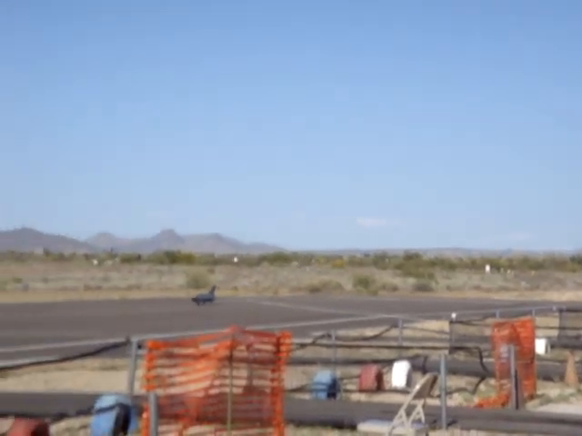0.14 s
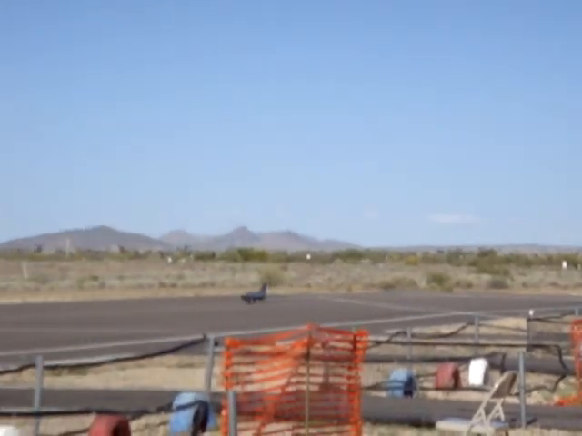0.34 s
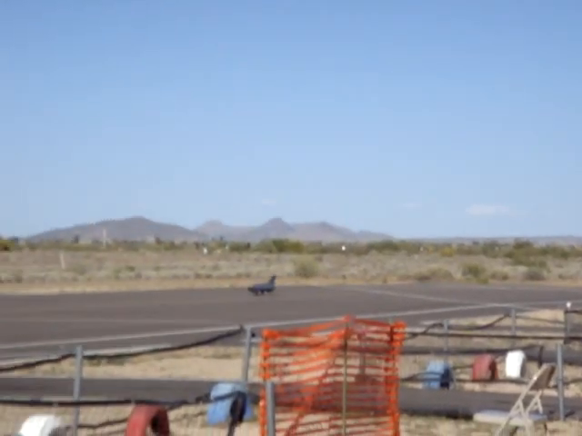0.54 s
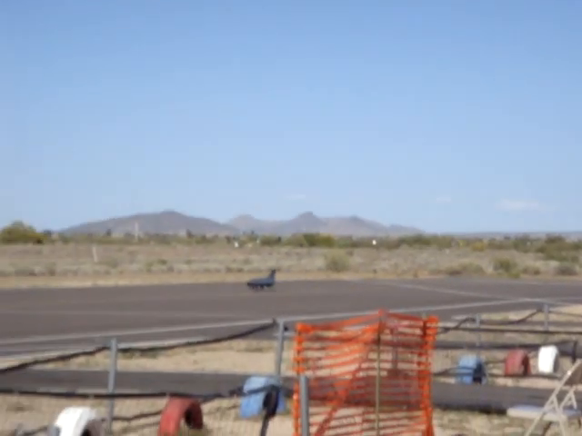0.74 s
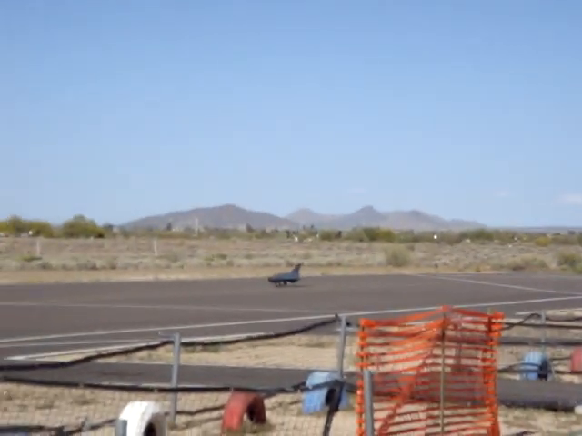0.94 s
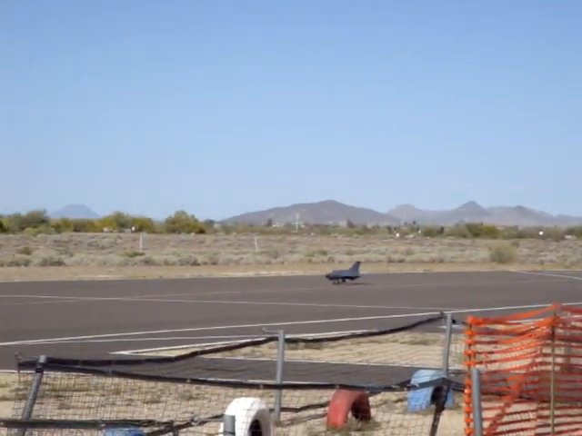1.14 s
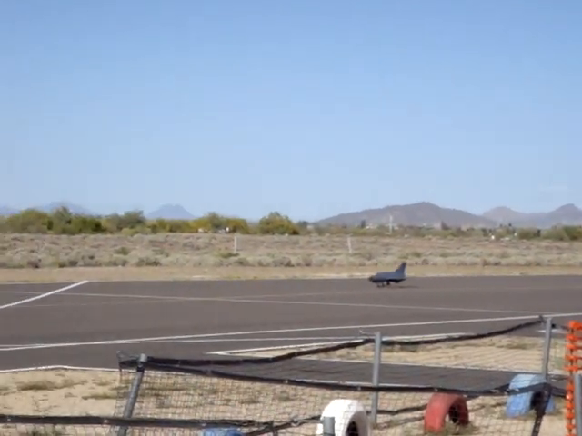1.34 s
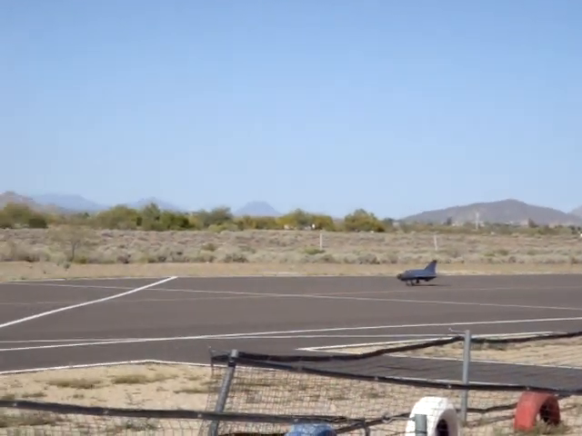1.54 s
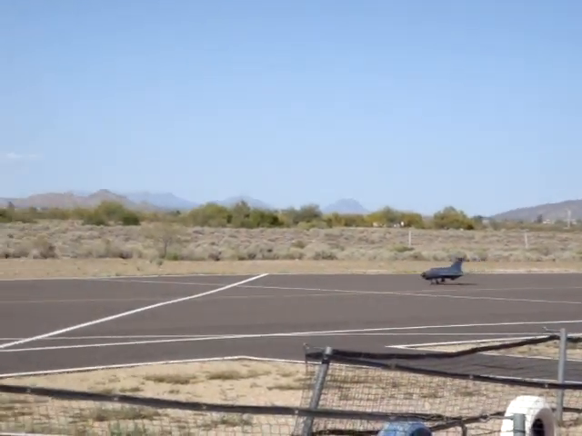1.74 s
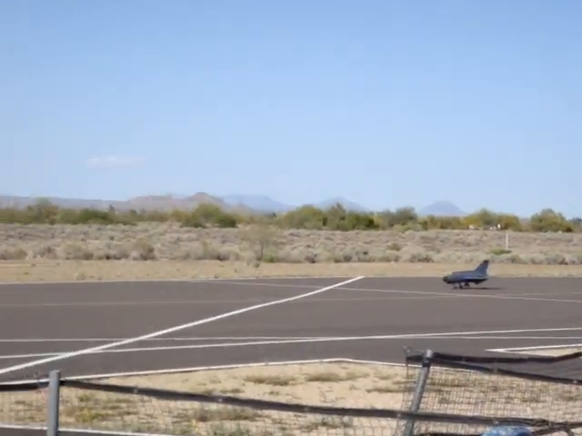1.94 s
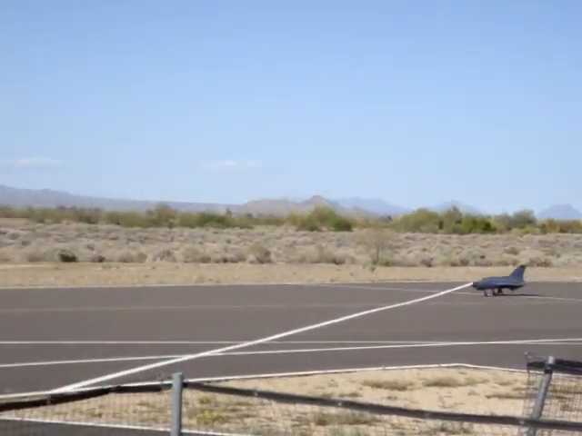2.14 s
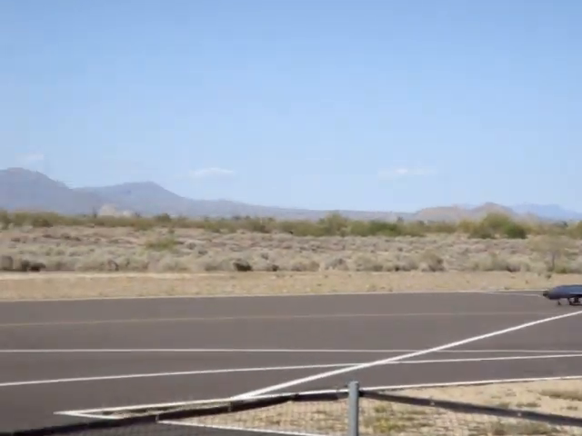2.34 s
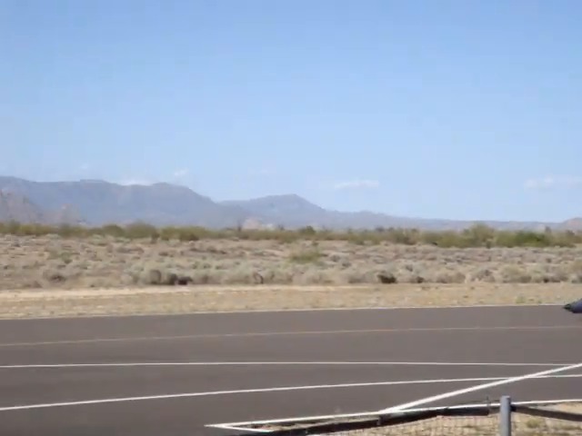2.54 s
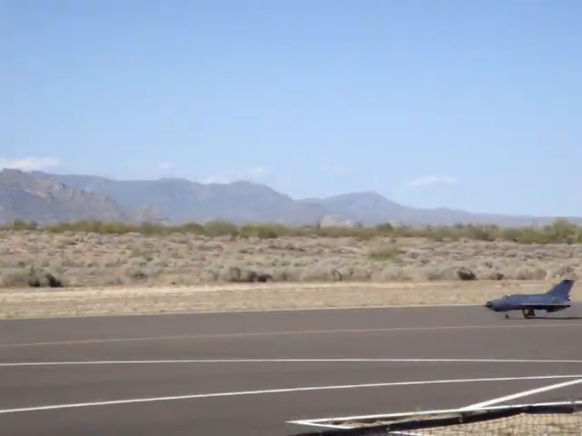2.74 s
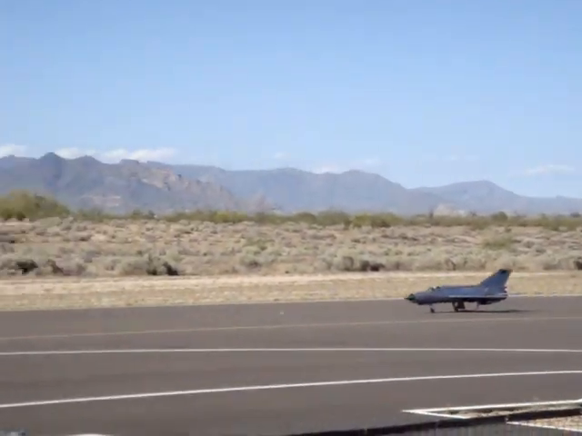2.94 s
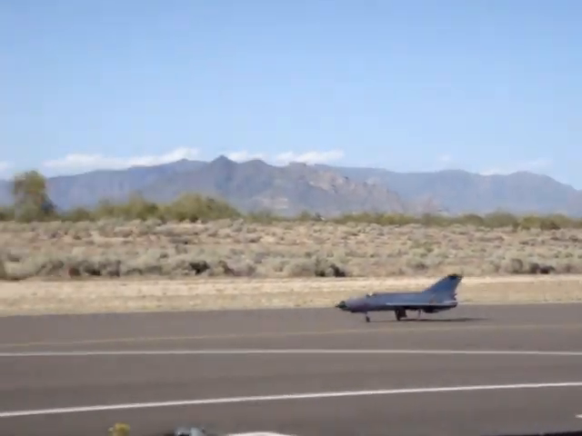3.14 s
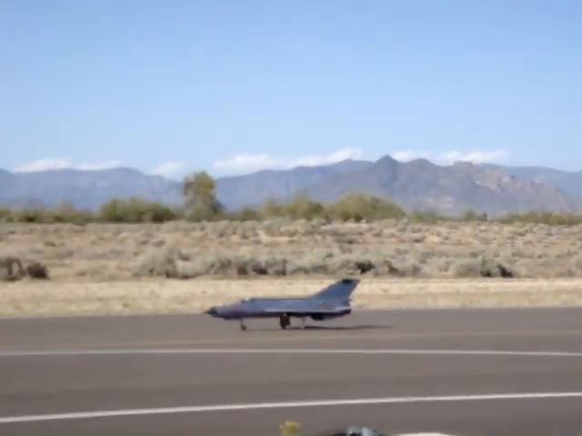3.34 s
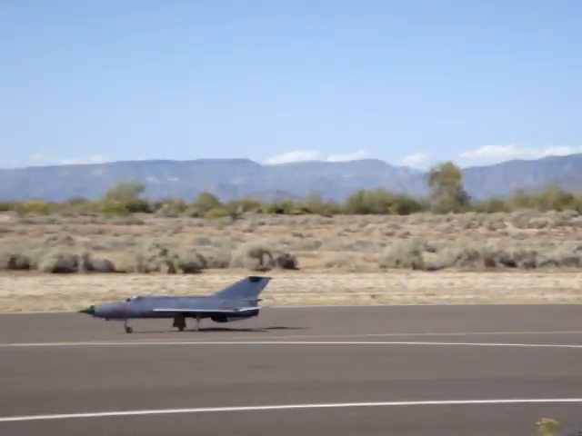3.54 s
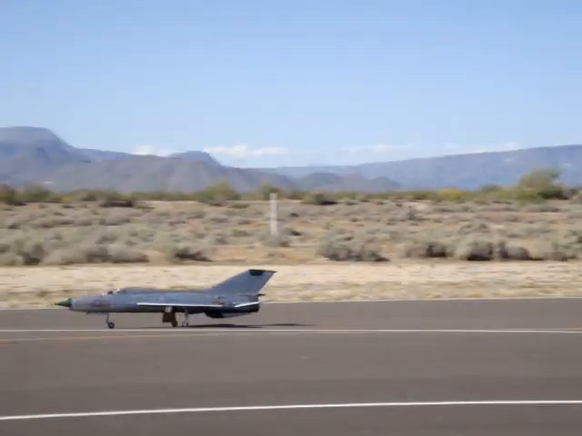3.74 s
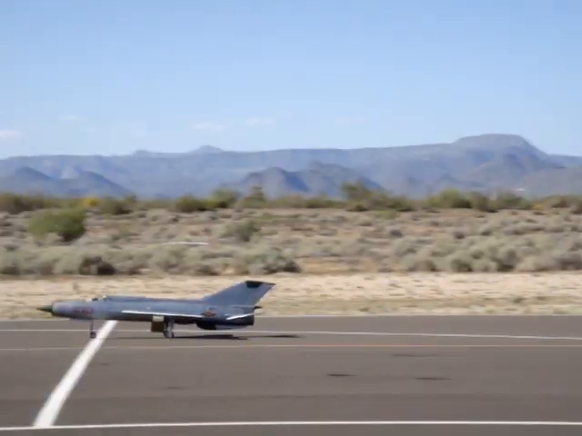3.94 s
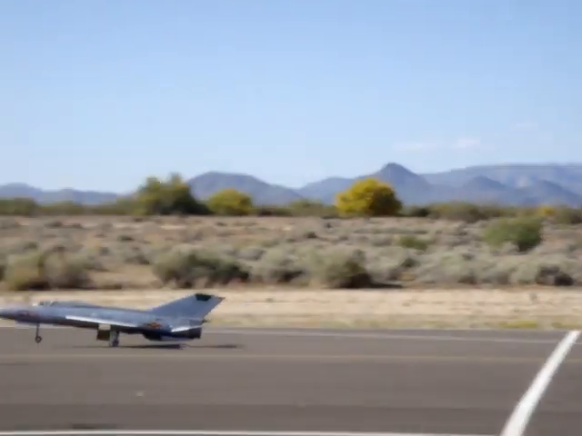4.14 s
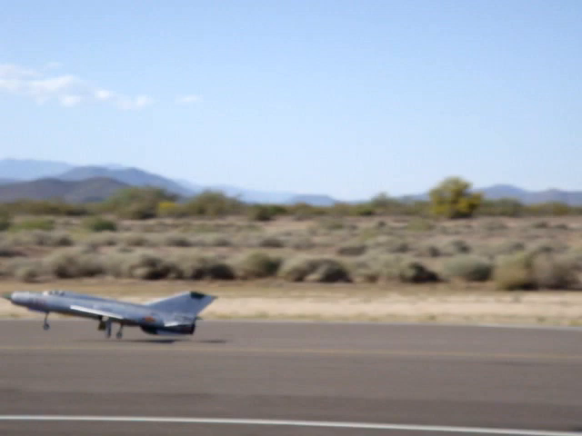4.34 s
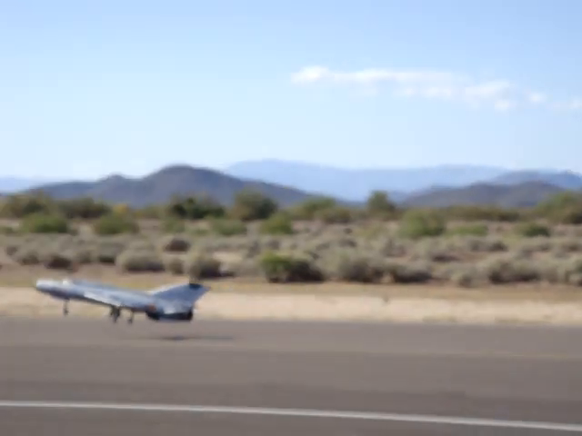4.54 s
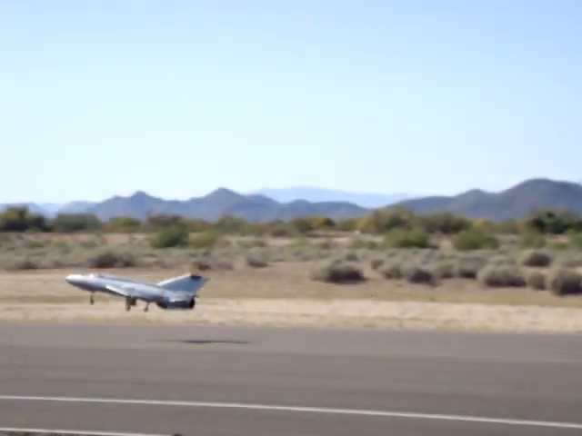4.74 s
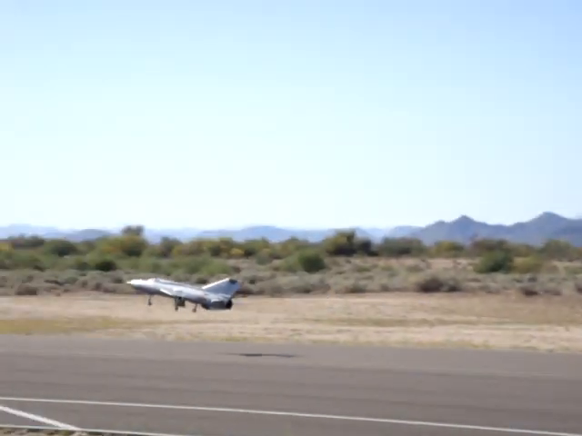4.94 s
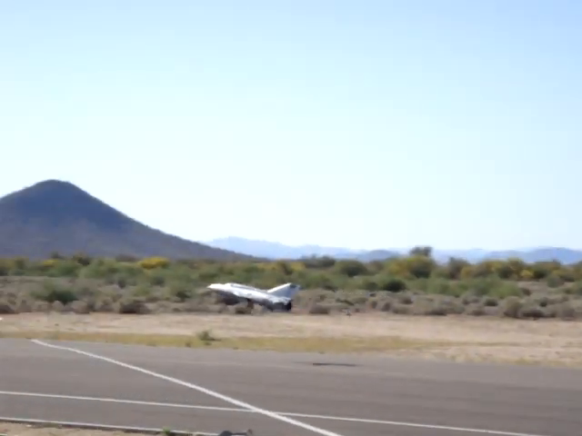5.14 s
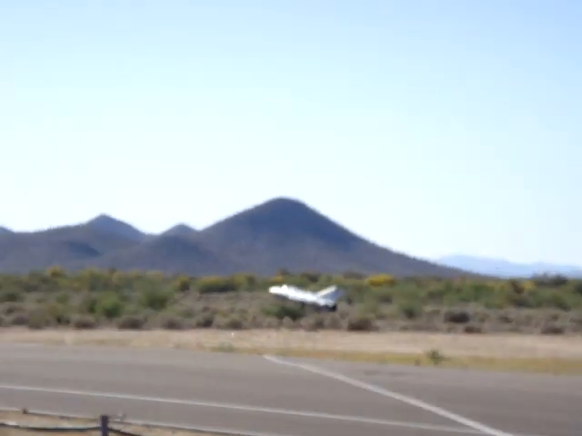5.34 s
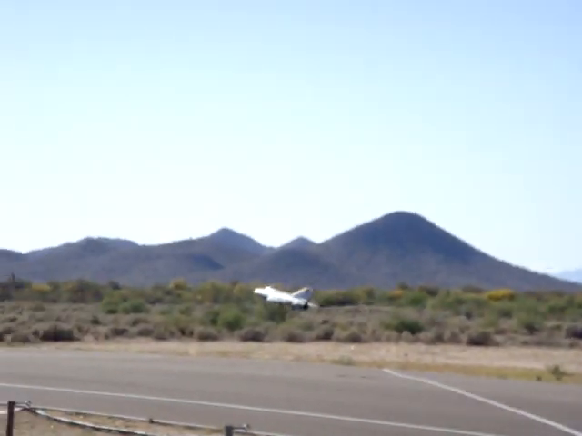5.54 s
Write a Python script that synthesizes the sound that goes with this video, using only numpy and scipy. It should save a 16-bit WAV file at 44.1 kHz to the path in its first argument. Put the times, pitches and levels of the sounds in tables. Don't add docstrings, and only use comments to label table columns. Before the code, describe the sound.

A small turbine model jet takes off from an open, dry airfield. From 0 s its hollow, noisy drone is already present, nasal and midrange with little deep bass, coloured by a shifting runway echo, with faint high rotor whine. Small dry camera ticks come near 0.6 s and once at 1.2 s. Wind bumps the microphone irregularly, hardest around 2.0 s and again near 2.4 s. The drone swells to its loudest at about 2.8-3.1 s, with a brief clear whistle near 3.1 s. The whine then drops away by about 4 s as the pitch slides slightly down and a bright, crackling exhaust hiss opens up. At about 4.6 s the jet lifts off: the lower body suddenly thins while hiss stays strong. The drone dips near 5.1 s, then swells again until the abrupt end at 5.7 s. Turbulent air makes everything waver; faint electronic hiss and grainy treble dropouts remain.

```python
import sys
import numpy as np
from scipy import signal
from scipy.io import wavfile
from scipy.ndimage import uniform_filter1d

SR = 44100
rng = np.random.default_rng(int(sys.argv[2]) if len(sys.argv) > 2 else 0)


def unload_audio(sound):
    columns = np.transpose(np.atleast_2d(sound))
    steps = np.round(np.clip(columns, -1, 1) * 32767)
    wavfile.write(sys.argv[1], SR, steps.astype(np.int16))


def boost(x):
    u = np.asarray(x, float) / 20
    return 10 ** u


N = 250929
HOP, SIZE = 256, 1024
FRAMES = N // HOP + 4

# [t/s,
# tailpipe drone level/dB, exhaust jet level/dB]
TAKEOFF_RUN = [(0, -31.5, -56.5), (.6, -25, -53), (1.3, -26.5, -52), (1.7, -24.5, -48), (2.15, -21.5, -45),
               (2.45, -19.5, -45), (2.62, -17.5, -43.5), (2.76, -14.5, -32.5), (3.02, -14.5, -36.5),
               (3.15, -16, -35), (3.5, -18, -29), (4.0, -23.5, -30), (4.06, -18.5, -28), (4.55, -20, -27),
               (4.75, -20, -25), (5.1, -26.5, -24), (5.3, -22.5, -25), (5.69, -17.5, -24)]


def evened(x):
    return x / np.sqrt(np.mean(x ** 2) + 1e-20)


def columns(rows, t):
    s, *values = np.transpose(rows)
    return [np.interp(t, s, v) for v in values]


def follow(law, t):
    drone_db, jet_db = columns(TAKEOFF_RUN, t)
    return law[0] * drone_db + law[1] * jet_db + law[2]


def resonances(modes, hz, shift, steep):
    return sum(boost(db) ** 2 / (1 + (2 * (hz - f * shift) / width) ** 2) ** steep for f, width, db in modes)


def at_level(power, db, hz, lo_hz, hi_hz):
    inside = (hz >= lo_hz) & (hz < hi_hz)
    return power / (power * inside).sum(1, keepdims=True) * boost(db)[:, None] ** 2


def drift(frames, bins):
    z = rng.standard_normal((FRAMES, SIZE // 2 + 1))
    for _ in range(2):
        z = uniform_filter1d(z, frames, axis=0)
        z = uniform_filter1d(z, bins, axis=1)
    return evened(z)


def noise(power):
    a, b = rng.standard_normal((FRAMES, SIZE // 2 + 1, 2)).transpose(2, 0, 1)
    z = np.sqrt(power * 8 / 3) * (a + 1j * b) / 2
    return signal.istft(z.T, nperseg=SIZE, noverlap=SIZE - HOP)[1][:N]


def air_gain_db(t, hz):
    # [t/s, half length/s, f/Hz, gain/dB]
    air_pockets = [(2.12, 0.15, 1250, 10), (1.7, 0.21, 2460, 3.5), (3.392, 0.02, 5000, -8),
                   (3.47, 0.029, 5300, 3.5), (3.664, 0.035, 6000, -9), (3.97, 0.0077, 8000, 12.5),
                   (4.325, 0.017, 5000, -10), (4.15, .15, 1170, 1.5), (.1, 0.13, 1150, 5.5),
                   (0.27, 0.062, 2000, 4.5), (0.73, 0.092, 900, 0), (4.735, 0.23, 7800, 6.5),
                   (5.4, 0.072, 2000, 4), (3.1, 0.026, 2600, 4), (3.07, .04, 7600, 6.5),
                   (4.7, 0.017, 6500, -2.5), (.7, 0.11, 2200, -4), (2.21, 0.075, 5700, 5),
                   (4.29, 0.18, 366, -4), (4.1, 0.07, 8200, 4), (4.04, .02, 5800, -9), (2.9, 0.13, 550, 2),
                   (2.4, 0.11, 2300, -3.5), (3.74, .06, 210, 5), (1.79, 0.044, 9000, 5.5),
                   (3.15, 0.044, 3700, 4), (2.89, 0.04, 1700, 4), (3.92, 0.085, 1300, 3.5),
                   (4.8, 0.13, 2200, -2.5), (5.62, 0.11, 180, 4)]
    # [t/s, gain/dB]
    eddy_fades = [(1.33, -3), (2.46, -0.5), (2.66, -5.5), (2.79, -3.5), (2.99, -2.5), (3.2, -1.5),
                  (3.39, -4), (3.555, -2.5), (3.74, -4.5), (3.84, -1), (3.97, -3.5), (4.03, -3.5),
                  (4.26, -2.5), (4.31, -1), (4.701, -0.5), (4.87, -2), (5.04, -0.5), (5.29, -3.5),
                  (5.5, -1.5)]
    bumps = [(*row, 0.48) for row in air_pockets]
    bumps += [(s, 0.016, 2200, db, 0.7) for s, db in eddy_fades]
    total_db = 0
    for s, half, f, db, octaves in bumps:
        in_time = np.exp(-.5 * ((t - s) / half) ** 2)
        in_pitch = np.exp(-.5 * (np.log2((hz + 1) / f) / octaves) ** 2)
        total_db = total_db + db * in_time * in_pitch
    return total_db


def doppler_factor(t):
    approach, recede, abeam_s, turn_s = 1.033, 0.99, 4.15, .15
    return (recede + (approach - recede) / (1 + np.exp((t - abeam_s) / turn_s)))[:, None]


def pair_balance(t):
    # [t/s, half length/s, change of share, pair level/dB]
    yaws = [(.05, 0.13, .5, 1), (1.02, 0.065, 0.69, -3), (1.35, .15, -0.13, 2.5), (2.85, .08, -.15, 0),
            (3.38, 0.15, 0.41, 1.5), (3.64, .06, -.4, 1.5), (3.9, 0.053, 0.24, 2), (4.128, 0.067, 0.28, 3),
            (4.453, 0.13, .15, 2), (5.3, 0.12, 0.053, -1)]
    share = np.clip(follow((-0.02, 0.021, 0.72), t), .1, .7)
    pair_db = follow((0.62, .42, 3.62), t)
    for s, half, swing, swell_db in yaws:
        bump = np.exp(-.5 * ((t - s) / half) ** 2)
        share = share + swing * bump
        pair_db = pair_db + swell_db * bump
    return np.clip(share, 0, 1)[:, None], pair_db


def tailpipe(t, hz, share, pair_db):
    # [f/Hz, width/Hz, level/dB]
    low_modes = [
        (517.3, 125, -5),
        (622.3, 128, -1.5),
    ]
    # [f/Hz, width/Hz]
    mode_pair = [
        (930, 95),
        (1125, 105),
    ]
    # [f/Hz, width/Hz, level/dB]
    third_mode = [
        (1515, 240, 2.5),
    ]
    # [f/Hz, width/Hz, level/dB]
    upper_modes = [
        (2122, 360, -1),
        (2530, 230, -6.5),
        (2710, 205, -4),
    ]
    doppler = doppler_factor(t)
    drone_db = columns(TAKEOFF_RUN, t)[0]
    low = resonances(low_modes, hz, np.ones((FRAMES, 1)), 3.06)
    low = at_level(low, drone_db, hz, 420, 780)

    (front_hz, front_width), (rear_hz, rear_width) = mode_pair
    front = resonances([(front_hz, front_width, 0)], hz, 1, 1.25)
    rear = resonances([(rear_hz, rear_width, 0)], hz, doppler, 1.25)
    second = at_level((1 - share) * front + share * rear, pair_db, hz, 910, 1300)

    top_db = np.minimum(follow((.1, 0.71, 16), t), -8)[:, None]
    upper = resonances(third_mode, hz, doppler, 1.26) + resonances(upper_modes, hz, 0.97, 0.92)
    upper = upper + resonances([(3340, 330, top_db)], hz, 0.93, 1.06)
    slant_db = follow((-0.19, 0.29, 6.6), t)[:, None]
    upper = upper * boost(slant_db * np.log2(np.clip(hz, 1300, 3500) / 2000)) ** 2
    upper = at_level(upper, follow((0.25, 0.69, 6.07), t) - .7, hz, 1540, 2660)
    return low + second + upper


def exhaust_jet(t, hz):
    jet_db = columns(TAKEOFF_RUN, t)[1]
    tilt_db = follow((-0.13, 0.1, -8), t)[:, None]
    hiss = boost(tilt_db * np.log2((hz + 1) / 5000)) ** 2 / (1 + (2500 / (hz + 1)) ** 2.95)
    port_low = 1.5 * resonances([(6280, 1700, 0.0063)], hz, 1, 1.1)
    port_high = 0.75 * resonances([(9560, 1800, 0.014)], hz, 0.95, 2.5)
    hiss = hiss * (1 + port_low + port_high)
    return at_level(hiss, jet_db - .8, hz, 3400, 10000)


def path_gain(t, hz, share):
    # [f/Hz, width/Hz, share removed level/dB]
    notches = [
        (867, 130, -3),
        (1235, 47, -5),
        (1770, 58, -8),
        (3070, 160, -3.5),
        (5090, 170, -13),
    ]
    # [t/s, first cancelled f/Hz, strength 0-1]
    runway_echo = [
        (0, 1950, 0.15),
        (.45, 1540, 0.4),
        (.8, 1260, 0.5),
        (1.1, 1020, 0.26),
        (1.3, 820, 0.07),
        (1.5, 630, 0.4),
        (1.7, 530, 0),
        (5.69, 480, 0),
    ]
    gain = np.clip(1 - (1 - .5 * share) * resonances(notches, hz, 1.0, 1.0), .05, 1)
    notch_hz, echo = (c[:, None] for c in columns(runway_echo, t))
    echo = np.clip(echo, 0, .9) * np.clip((hz - 750) / 250, 0, 1) / (1 + (hz / 3200) ** 4)
    gain = gain * (1 + 2 * echo / (1 + echo ** 2) * np.cos(np.pi * hz / notch_hz))
    gain = gain * boost(air_gain_db(t[:, None], hz)) ** 2
    lift_s, lift_db, lift_hz = 4.615, -6, 2410
    airborne = np.clip((t[:, None] - lift_s) / 0.011, 0, 1)
    gain = gain * boost(lift_db * airborne / (1 + (hz / lift_hz) ** 3)) ** 2
    return gain / (1 + (260 / (hz + 1)) ** 6)


def engine():
    t, hz = np.arange(FRAMES) * HOP / SR, np.fft.rfftfreq(SIZE, 1 / SR)[None]
    share, pair_db = pair_balance(t)
    gain = path_gain(t, hz, share)
    scatter_db = 1.3 * drift(frames=14, bins=5) + .9 * drift(frames=4, bins=30)
    scatter_db = np.clip(hz / 2000, .2, 1) * scatter_db
    body = noise(tailpipe(t, hz, share, pair_db) * gain * boost(scatter_db) ** 2)
    patches_db = 1.16 * drift(frames=8, bins=20) + 2.7 * drift(frames=2, bins=40)
    fizz = noise(exhaust_jet(t, hz) * gain * boost(patches_db) ** 2)
    flutter = evened(uniform_filter1d(rng.standard_normal(N), size=180))
    return body + fizz * boost(.6 * flutter)


def rotor_tone(hz, db, twinkle_db):
    waver = evened(uniform_filter1d(rng.standard_normal(N), size=900))
    twinkle = evened(uniform_filter1d(rng.standard_normal(N), size=1500))
    turns = np.cumsum(hz * (1 + .0022 * waver)) / SR
    return np.sqrt(2) * boost(db + twinkle_db * twinkle) * np.sin(2 * np.pi * turns)


def whine():
    # [t/s, f/Hz]
    shaft = [
        (0, 2056),
        (.9, 2098),
        (1.9, 2141),
        (2.65, 2156),
        (3.3, 2148),
        (3.65, 2100),
        (4.1, 2060),
    ]
    # [t/s, half length/s, f/Hz, level/dB]
    glints = [
        (1.1, .05, 4220, -63),
        (1.64, .09, 4233, -51),
        (2.2, .08, 4258, -56),
        (2.7, .05, 4298, -52),
        (3.13, .09, 4306, -37),
    ]
    t = np.arange(N) / SR
    hz, = columns(shaft, t)
    out = rotor_tone(3 * hz, follow((0, 0.87, -21.5), t) + 1.5, twinkle_db=3)
    out += rotor_tone(4 * hz, follow((0, .45, -49.5), t), twinkle_db=3.5)
    out *= np.clip((shaft[-1][0] - t) / 0.15, 0, 1)
    whistle = rotor_tone(2 * hz, follow((0, 0.77, -27), t), twinkle_db=0.5)
    out += whistle * np.clip((3.45 - t) / .15, 0, 1)
    for s, half, f, db in glints:
        out += rotor_tone(f + 0 * t, db, twinkle_db=2) * np.exp(-.5 * ((t - s) / half) ** 2)
    return out


def rumble(colour, db, lo_hz, hi_hz, lumpy_db):
    hz = np.fft.rfftfreq(SIZE, 1 / SR)[None]
    f, gain_db = np.transpose(colour)
    shape_db = np.interp(np.log(hz + 1), np.log(f), gain_db, right=-80)
    power = boost(shape_db) ** 2 + np.zeros((FRAMES, 1))
    lumps = uniform_filter1d(rng.standard_normal(N), size=900)
    lumps = evened(uniform_filter1d(lumps, size=900))
    return noise(at_level(power, db, hz, lo_hz, hi_hz)) * boost(lumpy_db * lumps)


def wind():
    # [t/s, peak level/dB, width/ms]
    thumps = [(0.363, -21, 2.8), (0.644, -26, 1.4), (0.7563, -26, 2.2), (0.7768, -26, 2.7),
              (1.036, -23, 2.2), (1.171, -19, 1.4), (1.185, -24, 3.8), (1.2723, -24, 2.8), (1.285, -27, 2),
              (1.3317, -21, 1), (1.472, -22, 1.6), (1.801, -26, 2), (1.8787, -16, 0.97),
              (2.0308, -19.5, 2.7), (2.0383, -11.5, 1.3), (2.0508, -18, 2), (2.0839, -18.5, 1.6),
              (2.2257, -28, 1.4), (2.409, -19, 2.2), (2.43, -15.5, 1.4), (2.441, -23.3, 2.2),
              (2.509, -17.5, 3.8), (2.728, -27, 3.8), (3.1023, -20, 1.9), (3.127, -27, 2.2),
              (3.706, -18, 1), (3.8096, -25, 2.2), (4.688, -26.5, 2.2), (5.5465, -19, 2.2),
              (5.6688, -22.1, 1.5)]
    # [t/s, level/dB]
    breeze = [
        (0, -64),
        (.3, -50),
        (2.6, -50),
        (2.9, -42),
        (3.5, -51),
        (4.05, -58),
        (4.55, -47),
        (5.0, -52),
        (5.35, -55),
    ]
    # [f/Hz, level/dB per Hz]
    roar_colour = [(40, -25), (110, -23.5), (180, -2.5), (300, 0), (450, 0.5), (800, 0), (1500, -8.5)]
    buffet_colour = [(15, -20), (35, -0.5), (70, -1.5), (120, 8), (200, -13.5), (400, -30)]
    t = np.arange(FRAMES) * HOP / SR
    roar_db = follow((0.45, .12, -24), t) + air_gain_db(t, 280)
    gust_db, gust_s = -27.5, .09
    gusts = sum(boost(db + gust_db) ** 2 * np.exp(-.5 * ((t - s) / gust_s) ** 2) for s, db, _ in thumps)
    buffet_db = 10 * np.log10(gusts + boost(columns(breeze, t)[0]) ** 2)
    out = rumble(roar_colour, roar_db + 4.0, 150, 400, lumpy_db=1.4)
    out += rumble(buffet_colour, buffet_db + 0.5, 25, 130, lumpy_db=4.5)
    pushes, ms = np.zeros(N), np.arange(-400, 400) / SR * 1000
    for s, db, width_ms in thumps:
        part = pushes[round(s * SR) - 400:][:800]
        part += (boost(db + 3.5) * np.exp(-2.8 * (ms / width_ms) ** 2))[:len(part)]
    bass_cut = signal.butter(3, 95, "high", fs=SR, output="sos")
    return out + signal.sosfilt(bass_cut, pushes)


def camera():
    # [f/Hz, level/dB rms]
    electronic_tone = [
        (8861, -69),
    ]
    # [t/s, peak level/dB]
    ticks = [
        (0.5807, -23),
        (0.592, -21),
        (0.639, -18),
        (1.2424, -23),
    ]
    t = np.arange(N) / SR
    out = sum(np.sqrt(2) * boost(db) * np.sin(2 * np.pi * hz * t) for hz, db in electronic_tone)
    out = out * boost(3.0 * evened(uniform_filter1d(rng.standard_normal(N), size=2500)) - 1.5)
    out += boost(-63.5) * evened(signal.lfilter([1], [1, -.4], rng.standard_normal(N)))
    u = np.arange(300) / SR
    for s, db in ticks:
        ring = np.sin(2 * np.pi * 1700 * u) * np.exp(-u / 0.00054)
        snap = ring + 0.19 * rng.standard_normal(300) * np.exp(-u / 0.00029)
        out[round(s * SR):][:300] += boost(db) * snap / abs(snap).max()
    return out


def scene():
    return (engine() + whine() + wind() + camera())[None]


def band_limit(x):
    return signal.sosfilt(signal.butter(12, 10780, fs=SR, output="sos"), x)


def record(dry):
    limited = .95 * np.tanh(dry[0] / .95)
    hz, t, z = signal.stft(limited, SR, nperseg=256, noverlap=192)
    edges_hz = np.array([5000, 5700, 6400, 7200, 8000, 8800, 9600, 11000])
    bands = len(edges_hz) + 1
    chance = np.interp(t, [0, 3.3, 3.9, 4.9, 5.2], [.012, .03, .07, .085, .025])[:, None]
    empty = np.zeros((len(t), bands), bool)
    for block in (4, 8):
        draws = rng.random((len(t) // block + 1, bands))
        empty |= np.repeat(draws, block, axis=0)[:len(t)] < chance
    empty[:, [0, -1]] = False
    empty = empty[:, np.searchsorted(edges_hz, hz)].T
    x = signal.istft(np.where(empty, boost(-34) * z, z), SR, nperseg=256, noverlap=192)[1][:N]
    low_pass = signal.firwin(1279, 10075, window=("kaiser", 10), fs=SR)
    x = signal.oaconvolve(x, low_pass, "same")
    return band_limit(x[None])


dry = scene()
out = record(dry)
unload_audio(out)
```